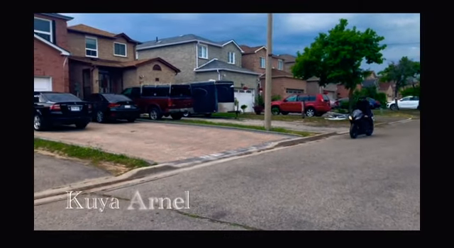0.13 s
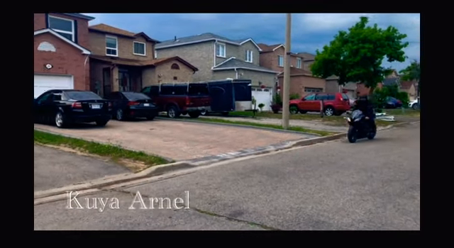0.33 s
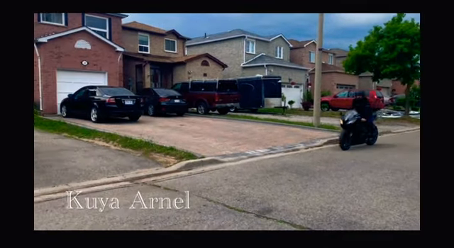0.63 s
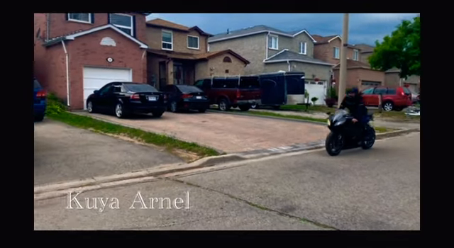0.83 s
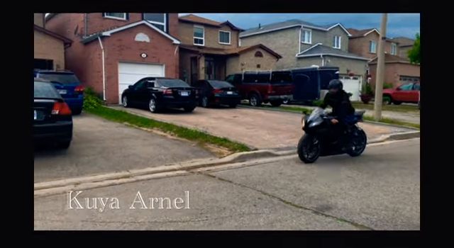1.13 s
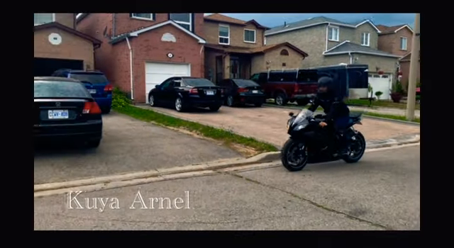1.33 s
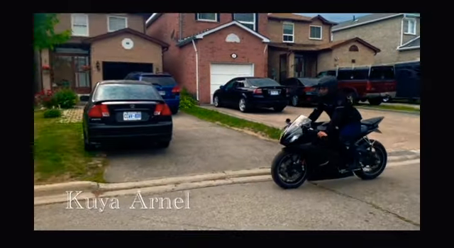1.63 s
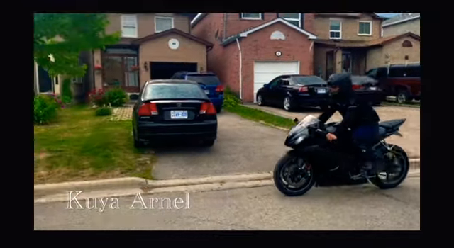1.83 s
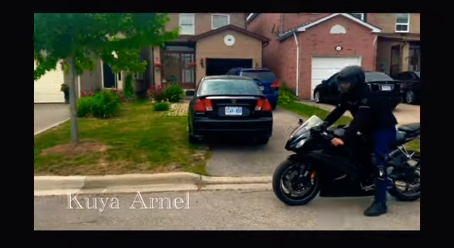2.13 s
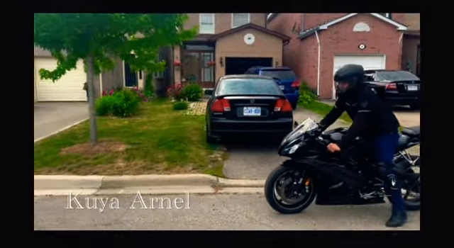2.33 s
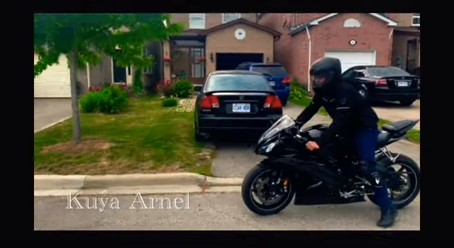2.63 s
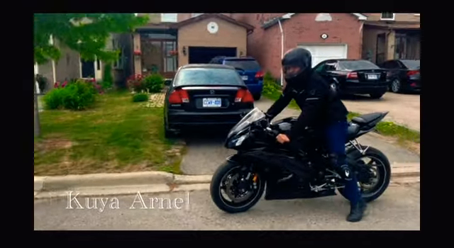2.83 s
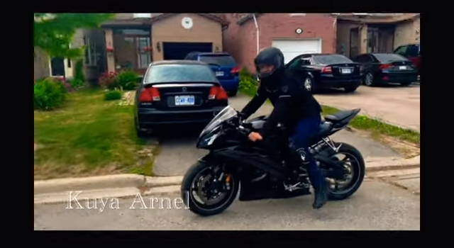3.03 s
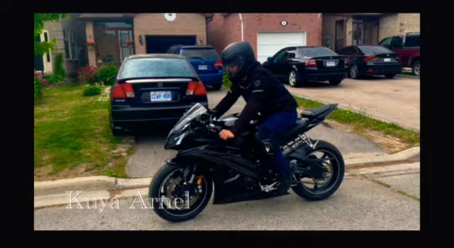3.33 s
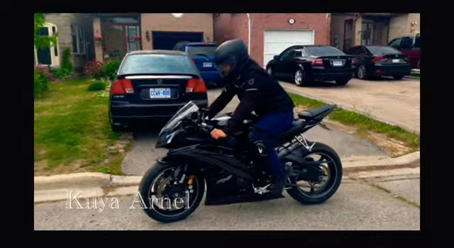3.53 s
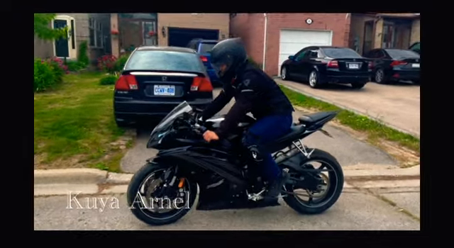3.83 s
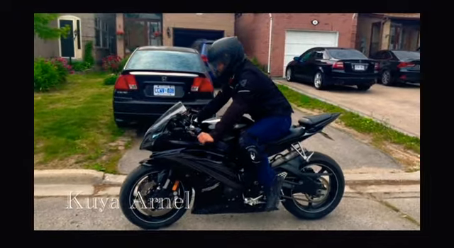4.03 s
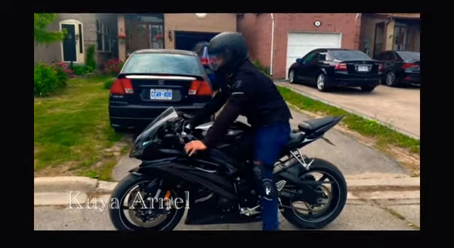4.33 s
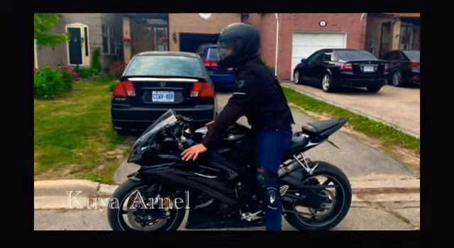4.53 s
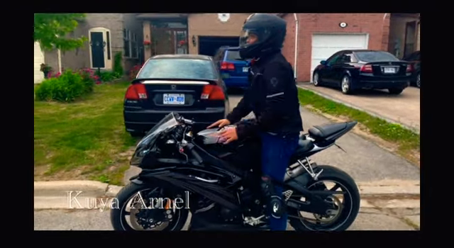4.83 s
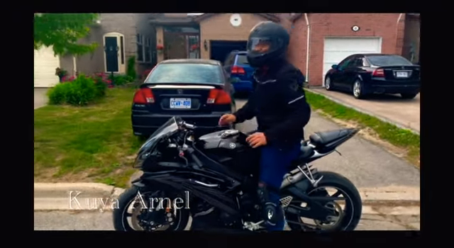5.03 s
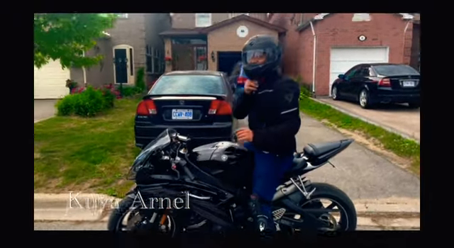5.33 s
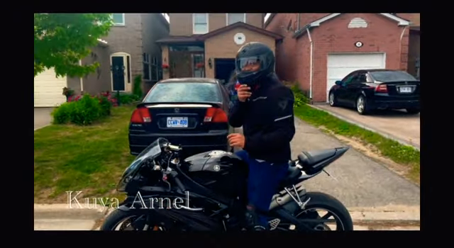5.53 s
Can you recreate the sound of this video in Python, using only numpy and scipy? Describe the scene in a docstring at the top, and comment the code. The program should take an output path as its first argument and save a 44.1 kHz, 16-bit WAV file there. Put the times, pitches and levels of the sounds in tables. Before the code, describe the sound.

A four-cylinder sport motorcycle approaches along a suburban street. At 0 s it is distant and off to the right, its throttle just closing; the exhaust pitch slides down, rough and burbling, with soft pops and gassy mutter until about 1.1 s. It then settles into a low, throbbing idle of roughly 44 pulses a second, hunting slightly, with small stumbles around 3.1 to 3.5 s and again near 4.2 s. The sound swells most quickly between 2.3 and 3 s, moving toward centre, and keeps growing to the end as the bike comes within arm's reach. Close up, fast valve ticking, metallic casing clatter, fine hiss, thin gear whine and a pulsing rasp join the deep hum. A tiny scuff falls at 3.77 s, and a sharper, bright gritty click at 5.6 s. Short diffuse echo from house fronts and faint street rumble lie underneath; the engine still idles at 5.7 s.

```python
"""An uneven exhaust throb drops to an idle and grows louder over clatter, gear whine, scuffs and faint echo.
A four-cylinder sport motorcycle rolls up a suburban street, from 16 m to under 1.5 m of two microphone ports.
One running count of firings drives the exhaust lines, pipe rings, valve ticks and gear lines.
Shaped noise makes the hiss, mutter, scuffs, street rumble and the short echo of the house fronts."""
import sys
import numpy as np
from scipy import signal
from scipy.fft import rfft, irfft, next_fast_len
from scipy.io import wavfile
from scipy.ndimage import uniform_filter1d, map_coordinates

SR = 44100
rng = np.random.default_rng(int(sys.argv[2]) if len(sys.argv) > 2 else 0)


def transcribe(u):
    """Save the signal u as a 16-bit wav file named by the first command-line argument.

    u: samples, shape (n,) or (channels, n), limited to [-1, 1]; the rate is SR.
    q: integer samples, one column per channel.
    """
    v = np.clip(np.atleast_2d(u).T, -1, 1)
    q = np.round(v * 32767).astype(np.int16)
    wavfile.write(sys.argv[1], SR, q)


N = 250929
IDLE_HZ = 44  # firings per second at idle
COAST_HZ = 8.2  # about this far above idle speed the engine is coasting and burns unevenly


def amp(db):
    """Decibels to gain."""
    return 10 ** (np.asarray(db) / 20)


def unit(x):
    """Scale to rms 1."""
    return x / np.sqrt(np.mean(x ** 2) + 1e-20)


def step(x):
    """A soft switch from 0 to 1 around x = 0."""
    return .5 + .5 * np.tanh(x)


def along(points, hz):
    """Read (frequency, value) points on a log frequency axis."""
    f, v = np.transpose(points)
    return np.interp(np.log(hz + 1), np.log(f + 1), v)


def curves(rows):
    """One value per sample for each column after the time."""
    s, *cols = np.transpose(rows)
    return [np.interp(np.arange(N) / SR, s, c) for c in cols]


def wobble(rate):
    """A smooth random curve, rate knots a second."""
    knots = rng.standard_normal(int(N * rate / SR) + 4)
    return map_coordinates(knots, [np.arange(N) * rate / SR])


def filtered(x, response):
    """x times a complex response of frequency."""
    m = next_fast_len(N + SR // 2)
    return irfft(rfft(x, m) * response(np.fft.rfftfreq(m, 1 / SR)), m)[..., :N]


def coloured(x, spectrum):
    """x weighted by a (frequency, dB) spectrum, at rms 1."""
    return unit(filtered(x, lambda hz: amp(along(spectrum, hz))))


def resonances(modes, f):
    """Causal response of modes (centre, width, level) with alternating sign."""
    total = 0
    for k, (centre, width, db) in enumerate(modes):
        total = total + (-1) ** k * amp(db) * 1j * f * width / (centre * centre - f * f + 1j * f * width)
    return total


def beats(count):
    """Samples at which a running count passes whole numbers."""
    return np.flatnonzero(np.diff(np.floor(count)) > 0)


# Engine speed, falling off the throttle, then hunting around idle: start_s, firing_rate_hz
ENGINE_SPEED = [(0.0, 96.0), (0.13, 90.1), (0.4, 82.6), (0.62, 76.6), (0.77, 71.1), (0.93, 54.6),
                (1.02, 51.5), (1.08, 47.6), (1.15, 48.0), (1.21, 44.4), (1.4, 46.5), (1.47, 45.3),
                (1.54, 47.0), (1.65, 45.4), (1.79, 44.8), (1.9, 45.2), (2.26, 44.4), (2.33, 42.7),
                (2.43, 45.0), (2.5, 42.4), (2.57, 44.9), (2.71, 42.9), (2.88, 46.1), (2.97, 42.2),
                (3.1, 46.8), (3.2, 40.9), (3.28, 44.9), (3.35, 42.2), (3.43, 47.5), (3.49, 42.1),
                (3.56, 46.1), (3.66, 43.3), (3.74, 45.5), (3.93, 44.3), (4.0, 42.9), (4.08, 45.7),
                (4.17, 41.6), (4.38, 45.4), (4.48, 44.2), (4.6, 44.4), (4.78, 43.8), (4.87, 44.7),
                (5.08, 42.6), (5.15, 44.9), (5.23, 42.4), (5.35, 45.6), (5.55, 43.3), (5.69, 44.3)]
# The bike nears the microphone: start_s, distance_m
BIKE_DISTANCE = [(0, 16), (0.85, 13.4), (1.15, 11.2), (2.25, 9.15), (2.55, 6.65), (2.85, 3.94), (3.3, 3.45),
                 (3.65, 2.6), (4.1, 2.26), (4.5, 1.85), (5.69, 1.38)]
EXHAUST_DB = -16  # at 1 m
NEAR_M = 4.82  # around this distance the close sound takes over from the far one
SHUT_S, THROTTLE_DB = 0.069, 2.5  # the throttle closes; until then the exhaust is this much louder
OVERRUN_HZ, OVERRUN_LOSS_DB = 83.6, 6.5  # above this firing rate the exhaust is this much weaker
# share of burble against throb: at idle, added when coasting, added far off
IDLE_UNEVEN, COAST_UNEVEN, FAR_UNEVEN = 0.16, 0.16, 0.13


def motorcycle():
    """One crankshaft drives exhaust and mechanics; both fall off with distance."""
    t = np.arange(N) / SR
    speed = uniform_filter1d(curves(ENGINE_SPEED)[0], size=SR // 16)  # the flywheel rounds off each change
    firings = np.cumsum(speed) / SR
    metres, = curves(BIKE_DISTANCE)
    near = 1 / (1 + (metres / NEAR_M) ** 3.24)
    shut = step((t - SHUT_S) / 0.016)
    coasting = shut * np.tanh(((speed - IDLE_HZ) / COAST_HZ) ** 2)
    stumble, dip_db = stumbling()
    uneven = IDLE_UNEVEN + COAST_UNEVEN * coasting + FAR_UNEVEN * (1 - near) + stumble

    exhaust_db = EXHAUST_DB - dip_db + THROTTLE_DB * (1 - shut)
    exhaust_db = exhaust_db - OVERRUN_LOSS_DB * step((speed - OVERRUN_HZ) / 3)
    mixture = throb(speed, firings, uneven, near) + uneven * burble(firings)
    exhaust = amp(exhaust_db) * mixture / np.sqrt(1 + uneven ** 2)

    machinery = spread(mechanics(firings, near) + gears(firings) + rasp(firings))
    at_one_metre = exhaust + pops() + mutter(firings, speed) + machinery
    return bearing(at_one_metre, metres) / metres


# Exhaust lines at idle, relative to each other: multiple_of_firing_rate, level_db
EXHAUST_LINES = [(1, 0), (1.5, -27), (2, 1), (2.5, -26.5), (3, 2.5), (3.5, -13), (4, -2), (4.6, -15),
                 (5, -22.5), (6, -11), (6.5, -27), (7, -26.5), (7.5, -15), (8, -29), (9, -25), (10, -32),
                 (11, -35.5)]
# Exhaust brightness as its angle to the listener changes: start_s, tilt_db_per_octave
EXHAUST_TILT = [(0, 7), (.5, -4), (1.2, 0.2), (2.3, 0.3), (2.85, 0), (3.9, 0.8), (4.8, 0.6), (5.69, -0.4)]
# Upper hum of the exhaust as the bike moves: start_s, level_db
HUM_LEVEL = [(0, -1.5), (.3, 7), (.9, -2), (1.4, -3.5), (2.2, 3.5), (2.9, 4.5), (3.4, -0.5), (4, 0.5),
             (4.8, -1), (5.69, -1)]
# Deepest throb, which sags now and then: start_s, level_db
BASS_LEVEL = [(0, 0), (1.05, -0.5), (1.25, -9), (1.46, -1), (1.57, -10), (1.63, 1), (1.85, 0), (2.2, 1.5),
              (3.13, -2.5), (3.21, -7), (3.33, -1.5), (3.79, 1), (3.86, -6), (4.0, 2), (5.52, -0.5),
              (5.69, -5)]
# Pass band of the muffler: pitch_hz, level_db
MUFFLER_BAND = [(30, -15.5), (50, -5.5), (62, -11.5), (78, -0.5), (100, -6.5), (130, -3), (160, 4),
                (190, -5), (240, -10), (340, -21.5), (420, -25.5), (550, -41), (1000, -63)]
HUM_HZ, HUM_WIDTH_HZ = 259.4, 34
MUFFLER_HZ, MUFFLER_WIDTH_HZ = 93.8, 12.7  # the band that the muffler holds back longest
FAR_BASS_DB = -1.5  # full change of the deepest throb at idle, far off
FAR_TOP_DB, FAR_TOP_HZ = -7, 340  # far off, lines whose idle pitch is above this are weaker
FAR_SMEAR = 0.9  # far off, echoes smear the firings into each other (radians of lag)


def throb(rate, firings, uneven, near, swell_db=4.5, drift_db=1.25):
    """Steady pressure wave of the firings; at speed its upper lines climb out of the muffler's pass band."""
    blur, waver, shift, half_shift = .27, .25, .15, .7
    tilt_db, = curves(EXHAUST_TILT)
    hum_db, = curves(HUM_LEVEL)
    bass_db, = curves(BASS_LEVEL)
    wave = np.zeros(N)
    for k, db in EXHAUST_LINES:
        hz, idle_hz = k * rate, k * IDLE_HZ
        line_db = db + bass_db * (k == 1) + tilt_db * np.log2(k)
        line_db = line_db + FAR_BASS_DB * ((1 - near) * IDLE_HZ / hz) ** 2
        line_db = line_db + FAR_TOP_DB * (1 - near ** 3) * step((idle_hz - FAR_TOP_HZ) / 25)
        line_db = line_db + along(MUFFLER_BAND, hz) - along(MUFFLER_BAND, idle_hz)
        line_db = line_db + hum_db * np.exp(-.5 * ((hz - HUM_HZ) / HUM_WIDTH_HZ) ** 2)
        line_db = line_db + swell_db * uneven * wobble(14) + drift_db * wobble(5.8)
        # uneven timing washes out the upper lines
        gain = amp(line_db) * np.exp(-.5 * (blur * uneven * hz / IDLE_HZ) ** 2)

        # the muffler spreads each pulse, and so does the hum's resonance
        lag = 2 * np.arctan((idle_hz - MUFFLER_HZ) / MUFFLER_WIDTH_HZ)
        lag = lag + 2 * np.arctan2(HUM_WIDTH_HZ, HUM_HZ - idle_hz)
        lag = lag + FAR_SMEAR * (1 - near) ** 2 * (k - 2) ** 2
        # the in-between lines wander most
        drift = half_shift * wobble(7) if k % 1 else shift * wobble(1.855)
        drift = drift + waver * uneven * np.sqrt(k) * wobble(12)
        wave -= gain * np.cos(2 * np.pi * k * firings - lag + drift)
    # even out the level over about a third of a second
    return wave / np.sqrt(np.abs(uniform_filter1d(wave ** 2, size=14000)) + 1e-9)


# Resonances of the exhaust pipe: pitch_hz, width_hz, level_db
PIPE_MODES = [(77.6, 45.5, -5), (152.8, 35.7, 2), (202.6, 45, -3), (269, 25, -11.5), (330, 52, -13)]


def burble(firings):
    """Each firing is a little too strong or too weak, and the excess rings the pipe."""
    at = beats(firings)
    kicks = np.zeros(N)
    kicks[at] = np.tanh(rng.standard_normal(len(at)))
    silencer = lambda f, edge_hz=400: 1 / np.sqrt(1 + (f / edge_hz) ** 10)
    return unit(filtered(kicks, lambda f: resonances(PIPE_MODES, f) * silencer(f)))


# Stumbles on weak firings: centre_s, added_unevenness, exhaust_dip_db (negative is louder)
STUMBLE_EVENTS = [(0.14, 0.44, -1.5), (0.24, 0.26, 0), (0.83, 0.051, -1.5), (0.93, 0.25, 2.5),
                  (1.12, 0, -1.5), (1.21, 0.16, 2.5), (2.87, 0, -1), (3.09, 0.09, -1.1), (3.24, 0.17, 0.5),
                  (3.35, 0.16, 0.5), (3.44, 0.16, -.7), (4.18, 0.23, 1.5), (4.39, 0.035, -0.3),
                  (5.09, 0.08, 0), (5.23, .05, 1), (5.35, 0.053, -1)]
STUMBLE_S = 0.039  # standard deviation of each bell-shaped stumble


def stumbling():
    """Added unevenness and exhaust dip: each stumble swells and passes."""
    t = np.arange(N) / SR
    total = 0
    for s, *sizes in STUMBLE_EVENTS:
        total = total + np.outer(sizes, np.exp(-.5 * ((t - s) / STUMBLE_S) ** 2))
    return total


# Heavy firings on the overrun, heard from 1 m: start_s, level_db
OVERRUN_POPS = [(0.096, -4), (0.408, -9), (0.556, -4), (0.603, -4), (0.701, -6), (0.774, -7), (0.819, -1.5),
                (0.866, -7), (1.002, -14), (1.081, -7.5)]
POP_HZ, POP_RING_S = 152, 0.056  # pitch; time to decay by 60 dB


def pops():
    """Single heavy firings on the overrun, each a short ring of the pipe."""
    t = np.arange(N) / SR
    out = np.zeros(N)
    for s, db in OVERRUN_POPS:
        age = np.maximum(t - s, 0)
        decay = amp(db - 60 * age / POP_RING_S)
        out += decay * (1 - np.exp(-age / .003)) * np.sin(2 * np.pi * POP_HZ * age)
    return out


# Gas in the pipe on the overrun: pitch_hz, level_db_per_hz
MUTTER_COLOUR = [(250, -30), (325, 2), (370, -4.5), (430, -8.5), (520, -9.5), (620, -18), (900, -50)]
MUTTER_DB = -40.5  # at 1 m


def mutter(firings, speed):
    """Gas flutters in the pipe with each firing while the engine still runs above idle."""
    flow = rng.standard_normal(N) * amp(3.0 * np.cos(2 * np.pi * firings))
    above_idle = step((speed - IDLE_HZ - COAST_HZ) / 4)
    return amp(MUTTER_DB) * above_idle * coloured(flow, MUTTER_COLOUR)


# Engine casing far up the street: pitch_hz, level_db_per_hz
FAR_CASING = [(200, -34), (330, 5.5), (420, -5), (550, -1.5), (750, -2.5), (1000, 1.5), (1300, -4.5),
              (1680, -3), (1850, -5.5), (2050, -5.5), (2700, -8), (3300, -14.5), (5500, -23), (7000, -45)]
# Engine casing close by: pitch_hz, level_db_per_hz
NEAR_CASING = [(200, -9.5), (400, 6.5), (490, 2), (560, -5.5), (700, -7), (930, -2.5), (1150, 3),
               (1450, -2), (1750, -2.5), (2050, -6), (2500, -7), (3200, -12), (6000, -22.5)]
# Narrow modes of the engine cases, heard close by: pitch_hz, width_hz, level_db
CASE_MODES = [(622, 19, 0), (754, 13, 2), (909, 37, -0.5), (993, 17, 3), (1090, 18, -1), (1374, 34, -15),
              (1581, 35, -3), (1646, 25, -0.5), (1762, 35, 0), (1814, 38, -3.5), (2168, 17, -5),
              (2396, 42, -6), (3100, 28, -8.5), (3730, 46, -14), (4010, 65, -10), (4625, 73, -9.5),
              (6120, 60, -13)]
# Engine cover facing the listener at the end: pitch_hz, width_hz, level_db
COVER_MODES = [(1145, 110, 0)]
# Mechanical hiss: pitch_hz, level_db_per_hz
HISS_COLOUR = [(1500, -29), (2900, 0.5), (4000, 3.5), (4700, -1.5), (5400, -2.5), (6900, 0.5), (8400, -1),
               (9900, 4.5), (11300, -0.5), (13500, 1), (15300, -1.5)]
CASING_DB = -39.5  # casing and cover together, at 1 m
HISS_DB, FAR_HISS_DB = -44.56, -0.56  # close by, referred to 1 m; added far off
KNOCK_PULSE_DB, CHATTER_DB = 0.56, 0.93  # swell within each firing; random waver at the idle rate
FACED_S, TURN_S = 5.06, 0.28  # the cover turns towards the listener: when, how fast
COVER_DB, COVER_PULSE_DB = -6.5, 1.5  # level against the casing; flutter with each firing


def mechanics(firings, near):
    """Knocking parts shake casing and cover above a treble hiss, as loud as at 1 m."""
    pulse = np.cos(2 * np.pi * firings)
    knocks = clatter(firings, ring_s=0.086, scatter_db=2.0, tick_share=0.56)
    knocks = knocks * amp(KNOCK_PULSE_DB * pulse + CHATTER_DB * wobble(IDLE_HZ))
    strikes = clatter(firings, ring_s=0.14, scatter_db=3.5, tick_share=0.39)
    ringing = unit(filtered(strikes, lambda f: resonances(CASE_MODES, f)))
    close_casing = amp(-2.0) * coloured(knocks, NEAR_CASING) + amp(-7.5) * ringing
    casing = (1 - near) * coloured(knocks, FAR_CASING) + near * close_casing

    facing = step((np.arange(N) / SR - FACED_S) / TURN_S)
    cover_ring = unit(filtered(knocks, lambda f: resonances(COVER_MODES, f)))
    cover = amp(COVER_DB + COVER_PULSE_DB * pulse) * facing * cover_ring

    hiss = coloured(clatter(firings, ring_s=0.13, scatter_db=11.0, tick_share=0.28), HISS_COLOUR)
    hiss_gain = amp(HISS_DB + FAR_HISS_DB * (1 - near))
    return amp(CASING_DB) * bounced(casing + cover, near) + hiss_gain * bounced(hiss, near)


def clatter(firings, ring_s, scatter_db, tick_share, count=16):
    """Valves seat in a fixed round over four firings, each with its own ring, above a rush of chain and gears."""
    at = beats(firings * count / 4)
    t = np.arange(SR // 20) / SR
    rings = rng.standard_normal((count, 2, len(t))) * amp(-60 * t / ring_s)
    rush = rng.standard_normal((2, N))
    sizes = amp(scatter_db * np.clip(rng.standard_normal(len(at)), -1.7, 1.7))
    ticks = np.zeros((2, N + len(t)))
    for i, start in enumerate(at):
        ticks[:, start:start + len(t)] += sizes[i] * rings[i % count]
    share = np.clip(tick_share, 0, 1)
    return np.sqrt(share) * unit(ticks[:, :N]) + np.sqrt(1 - share) * rush


# Gear whine as the engine's side turns past, from 1 m: start_s, mesh_level_db, octave_level_db
WHINE_LEVEL = [(0, -67, -60), (.92, -45.5, -62), (1.15, -48, -50), (1.5, -49, -51), (2.2, -58, -49),
               (2.78, -68, -47.5), (3.05, -61, -64), (3.8, -46.5, -52), (4.6, -51, -54), (5.69, -66, -75)]
MESH = 20.8  # tooth contacts per firing
WHINE_FUZZ_HZ = 80  # random knots per second on the mesh line, doubled on its octave


def gears(firings):
    """The primary gears whine: two fuzzy lines locked to the crankshaft."""
    out = np.zeros((2, N))
    for k, level_db in enumerate(curves(WHINE_LEVEL), 1):
        rate = WHINE_FUZZ_HZ * k
        fuzz = np.array([wobble(rate) + 1j * wobble(rate) for side in out])
        line = np.real(fuzz * np.exp(2j * np.pi * k * MESH * firings))
        out += amp(level_db) * unit(line)
    return out


# Rasp heard from 1 m: start_s, level_db
RASP_LEVELS = [(0, -59), (2.5, -47.5), (3.15, -47), (3.42, -45.5), (3.8, -46.5), (4.15, -59), (5.69, -44.5)]
# Colour of the rasp: pitch_hz, level_db_per_hz
RASP_COLOUR = [(400, -48), (630, 2.5), (780, 1), (1050, -2.5), (1400, -4), (2000, -15), (4000, -21),
               (5400, -34)]
RASP_PULSE_DB = 4.5  # swing either way within each firing


def rasp(firings):
    """A rasp pulses with the firings; it swells on the approach, fades, and returns at the end."""
    level_db, = curves(RASP_LEVELS)
    shaken = clatter(firings, ring_s=0.015, scatter_db=0.5, tick_share=0.4)
    shaken = shaken * amp(RASP_PULSE_DB * np.cos(2 * np.pi * firings + 1.6))
    return amp(level_db) * coloured(shaken, RASP_COLOUR)


# Short reflection off the road as the bike turns in: start_s, delay_ms
ROAD_BOUNCE = [(0, 0.97), (2.5, 1.2), (3.25, 1.49), (3.85, 0.99), (4.3, 0.78), (4.95, 0.66), (5.69, 1.6)]


def bounced(x, near, far_s=.0035, close_s=.0075, kerb=0.19, road=0.068):
    """Reflections off road and kerb comb the sound; their delays drift as the bike nears."""
    n = np.arange(N)
    late = lambda s: np.array([np.interp(n - s * SR, n, side) for side in x])
    kerb_s = far_s + (close_s - far_s) * near + .00008 * wobble(1.4)
    road_s = curves(ROAD_BOUNCE)[0] / 1000
    return unit(x + kerb * late(kerb_s) + road * late(road_s))


# Likeness of the two microphone sides: pitch_hz, correlation
SIDE_LIKENESS = [(60, 0.91), (300, .99), (480, 0.97), (630, 0.66), (800, 0.9), (1100, 0.97), (1700, 0.82),
                 (2030, 0.39), (2400, 0.48), (2850, 0.78), (3300, 0.23), (4100, 0.72), (5300, 0.19),
                 (6500, 1), (10000, 1), (15000, 0.98)]


def spread(pair):
    """Two unrelated signals become a partly alike left and right."""
    turn = lambda hz: np.arccos(np.clip(along(SIDE_LIKENESS, hz), 0, 1)) / 2
    mid, side = filtered(pair, lambda hz: np.array([np.cos(turn(hz)), np.sin(turn(hz))]))
    return np.array([mid + side, mid - side])


# Bike off to the right, added phase: pitch_hz, left_lead_rad
RIGHT_LEAD = [(100, 0), (400, -.3), (680, -1.5), (900, -.75), (1100, -.7), (1400, -1.2), (1700, -.9),
              (2400, -.7), (2750, .7), (3100, 2), (3600, 3.2), (4500, 2.6), (5600, 2), (6500, 0)]
# Bike off to the right, added level: pitch_hz, left_minus_right_db
RIGHT_LEAN = [(400, 0), (630, 3.5), (780, -5), (1100, -1), (2400, 1), (4500, -3.5), (6500, 0.5)]
ASIDE_M, ASIDE_SPAN_M = 4.7, 1.8  # beyond this distance the bike is off to the right; softness of the change


def bearing(x, metres):
    """Far up the street the bike is off to the right, and the microphone ports hear it at a slant."""
    hz, t, z = signal.stft(x, SR, nperseg=1024)
    aside = step((np.interp(t * SR, np.arange(N), metres) - ASIDE_M) / ASIDE_SPAN_M)
    sides = np.array([.5, -.5])[:, None, None] * aside
    lean = amp(sides * along(RIGHT_LEAN, hz)[:, None])
    lead = np.exp(1j * sides * along(RIGHT_LEAD, hz)[:, None])
    return signal.istft(z * lean * lead, SR, nperseg=1024)[1][:, :N]


# Scuffs and clicks of bike and rider, as they reach the microphone:
# centre_s, level_db, length_s (standard deviation), pitch_hz, width_octaves (standard deviation)
SCUFF_EVENTS = [(1.103, -63, 0.011, 2200, .8), (1.126, -55.5, 0.0089, 1500, 1.4),
                (3.765, -48.5, 0.0073, 4600, 0.67), (3.779, -52, 0.002, 6300, .3),
                (5.598, -37.5, 0.012, 9000, 1.3), (5.602, -43, 0.008, 7060, 0.24),
                (5.604, -47, 0.022, 474, .14)]


def scuffs():
    """Brief gritty rubs, each a swell of uneven noise around its own pitch."""
    t = np.arange(N) / SR
    out = np.zeros((2, N))
    for s, db, length_s, pitch_hz, octaves in SCUFF_EVENTS:
        grit = rng.standard_normal((2, N)) * amp(2.6 * wobble(540))
        band = lambda f: np.exp(-.5 * (np.log2((f + 1) / pitch_hz) / octaves) ** 2)
        out += amp(db) * unit(filtered(grit, band)) * np.exp(-.5 * ((t - s) / length_s) ** 2)
    return spread(out)


# Echo decay between the house fronts: pitch_hz, time_to_fall_60_db_s
ECHO_DECAY = [(150, 1), (2000, 0.75), (10000, 0.064)]


def houses(x):
    """House fronts return a diffuse echo after a thirtieth of a second, shortest in the treble."""
    hz, t, z = signal.stft(rng.standard_normal((2, SR // 2)), SR, nperseg=256)
    fade = amp(-60 * t / along(ECHO_DECAY, hz)[:, None])
    tail = signal.istft(z * fade, SR, nperseg=256)[1]
    delayed = np.pad(tail, ((0, 0), (SR // 30, 0)))
    return signal.fftconvolve(x, delayed / np.linalg.norm(tail[0]), axes=1)[:, :N]


# Background of the street: pitch_hz, level_db_per_hz
STREET_COLOUR = [(20, -18), (60, 14), (150, 1), (400, -17.5), (1000, -36), (2500, -38), (5000, -29),
                 (10000, -24), (15000, -31)]


def street():
    """The faint rumble of the neighbourhood, as steady shaped noise."""
    return amp(-53.0) * spread(coloured(rng.standard_normal((2, N)), STREET_COLOUR))


def scene():
    """The bike and its rider in the street; the echo carries little of the deep throb."""
    bike = motorcycle() + scuffs()
    echo = filtered(houses(bike), lambda hz: hz / (hz + 400))
    return bike + amp(-16.0) * echo + street()


# Level between the microphone ports: pitch_hz, left_minus_right_db
PORT_LEAN = [(60, -2), (110, 0), (250, 1.8), (400, 0), (520, 0), (640, -6), (850, -1), (1200, 0), (1800, 2),
             (3100, 1), (4000, -2), (5400, -5), (6500, -0.5), (9000, -0.5)]
# Phase between the microphone ports: pitch_hz, left_lead_rad
PORT_LEAD = [(60, -.25), (300, -.25), (700, .6), (1800, .6), (2150, 0), (2850, 1.5), (3600, -.3), (5100, 1),
             (6400, 0), (8500, -3.14), (11000, -6.28), (13400, -9.42), (15600, -12.5)]
TOP_HZ = 15750  # band limit


def record(dry):
    """Two microphone ports differ in level and phase; nothing passes above the band limit."""
    sides = np.array([[.5], [-.5]])
    ports = lambda hz: amp(sides * along(PORT_LEAN, hz)) * np.exp(1j * sides * along(PORT_LEAD, hz))
    return filtered(dry, lambda hz: ports(hz) * (hz < TOP_HZ))


dry = scene()
out = record(dry)
transcribe(out)
```